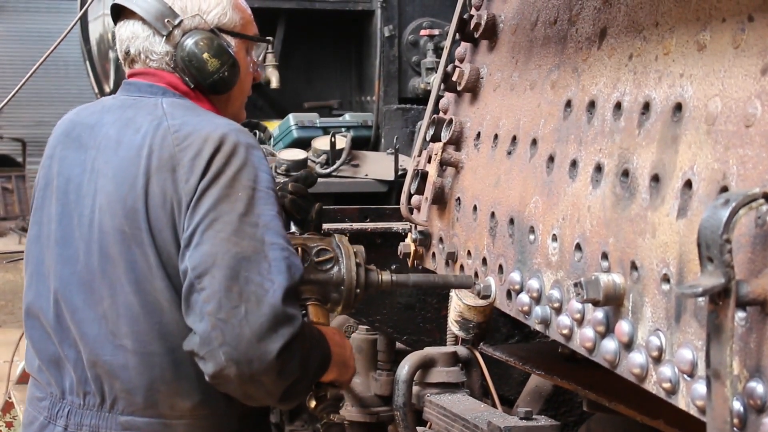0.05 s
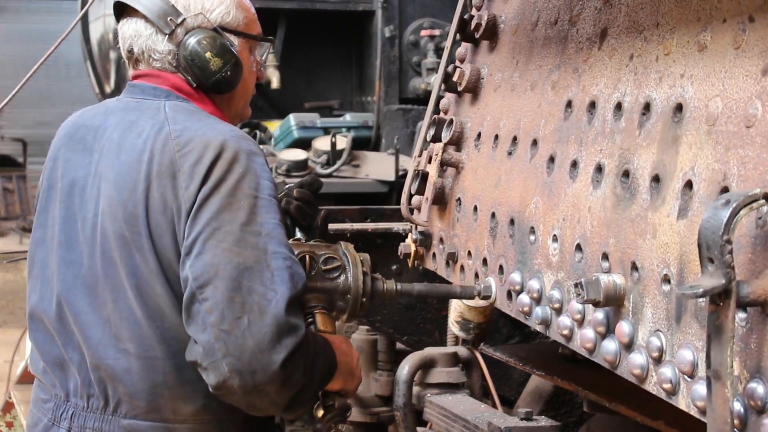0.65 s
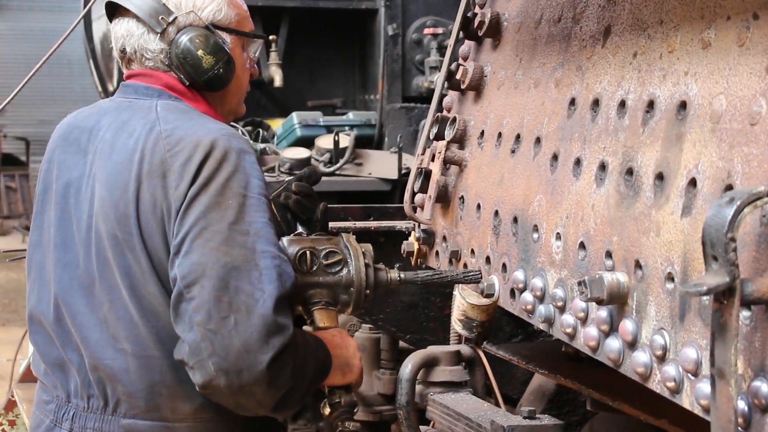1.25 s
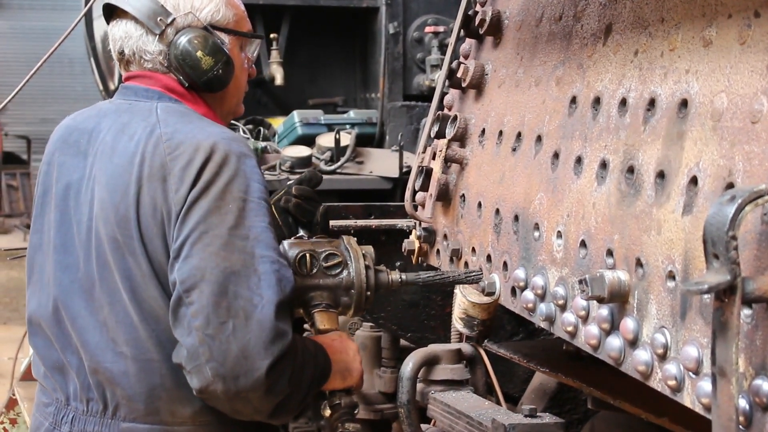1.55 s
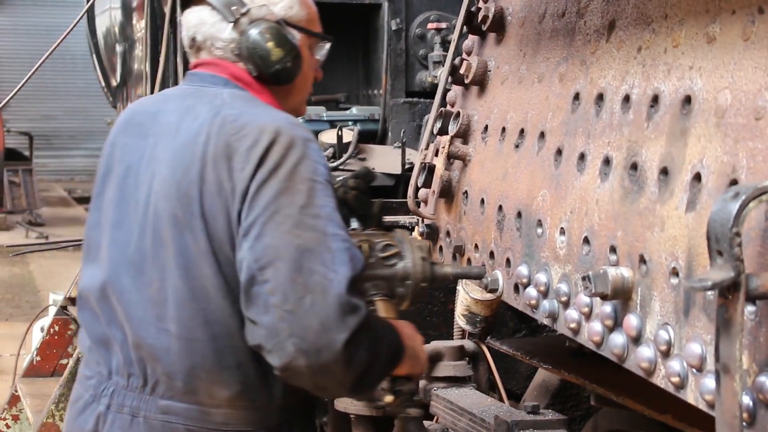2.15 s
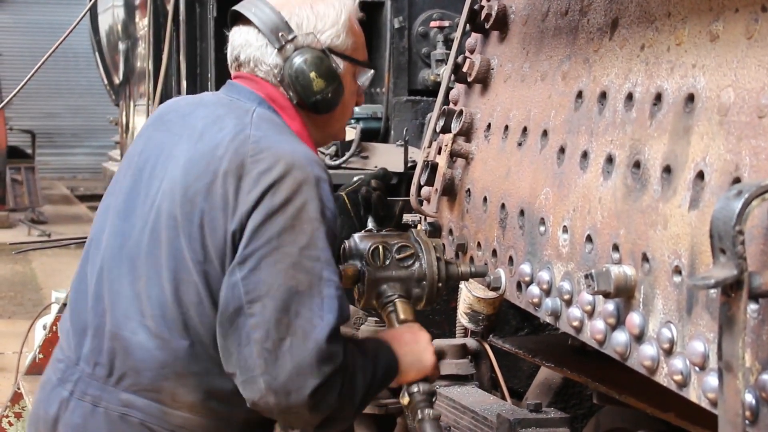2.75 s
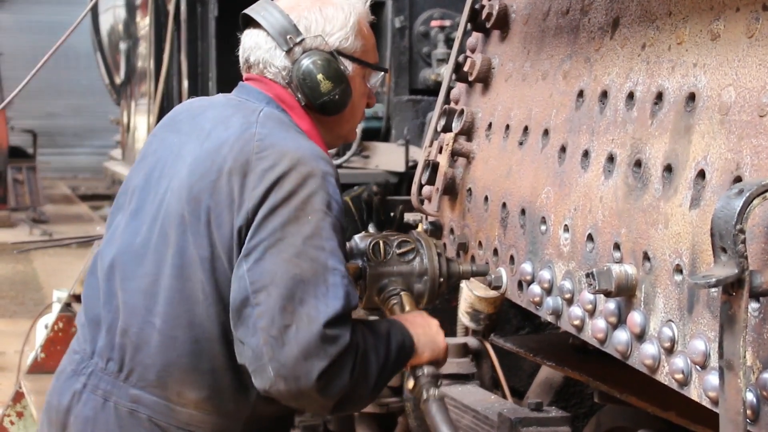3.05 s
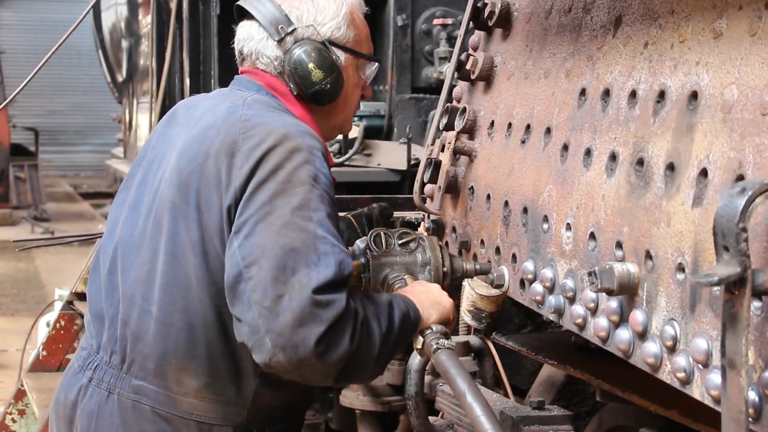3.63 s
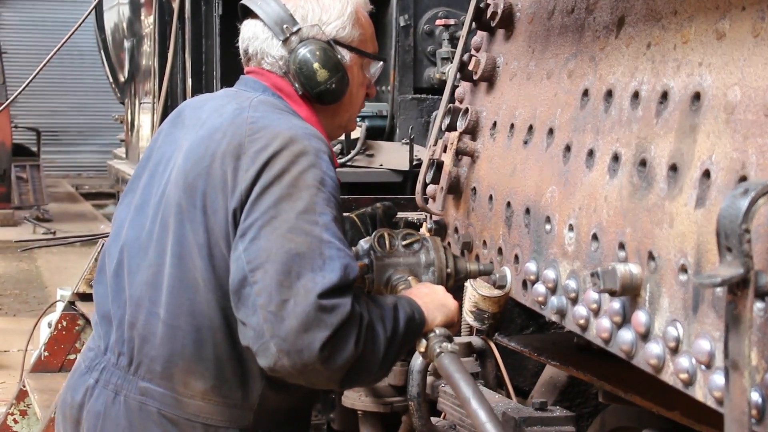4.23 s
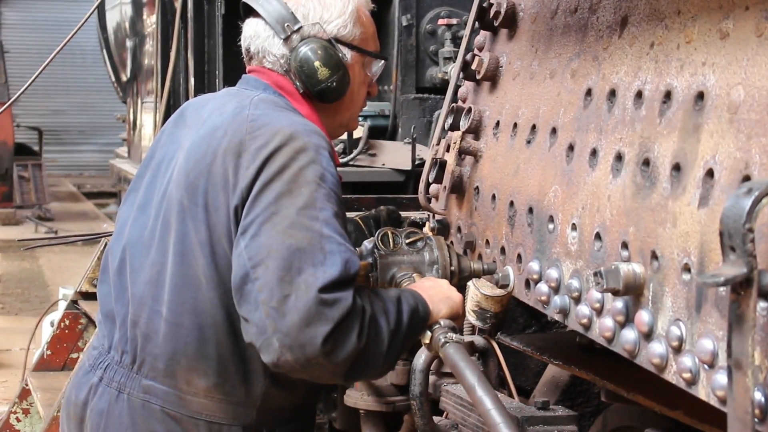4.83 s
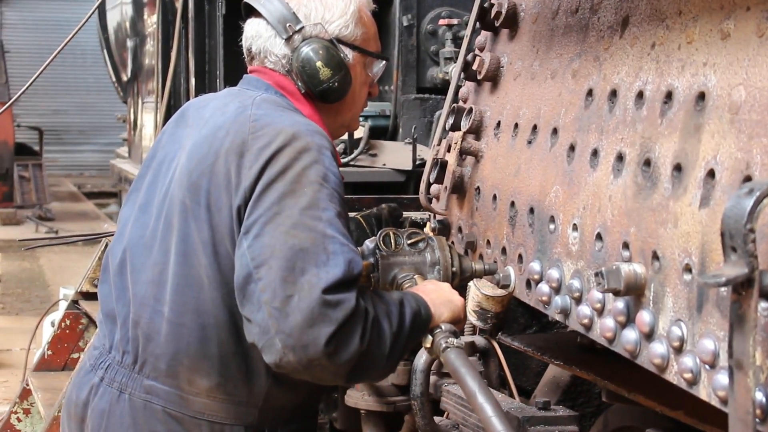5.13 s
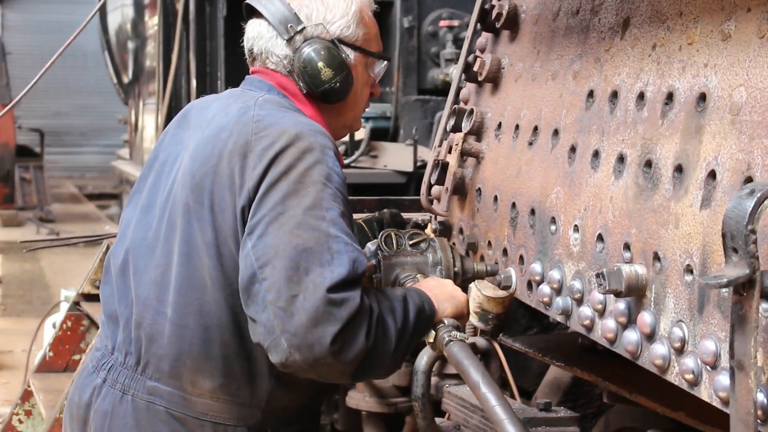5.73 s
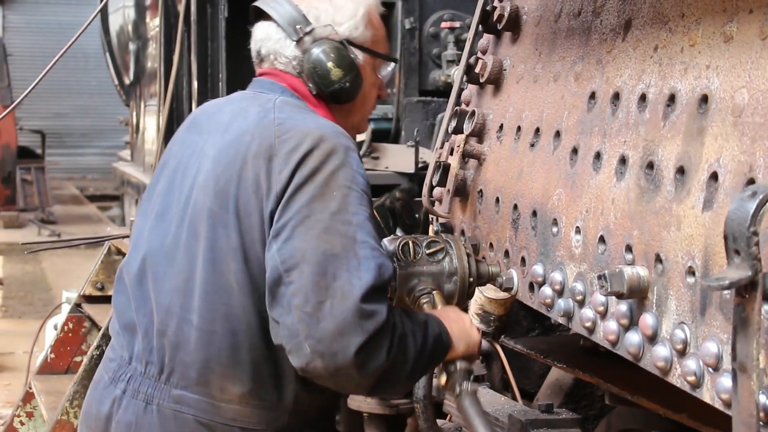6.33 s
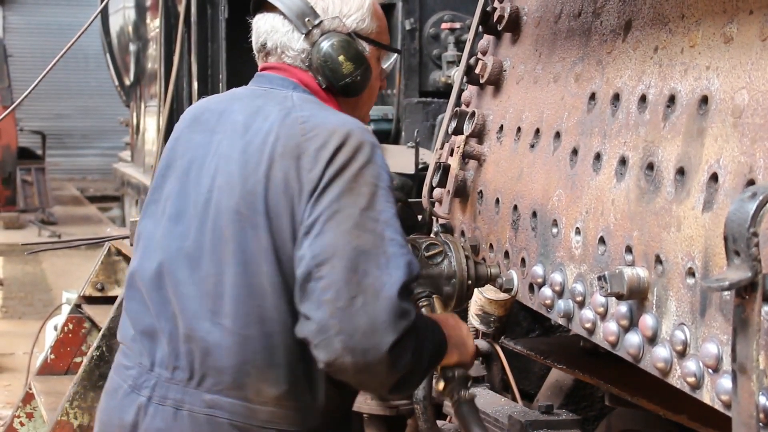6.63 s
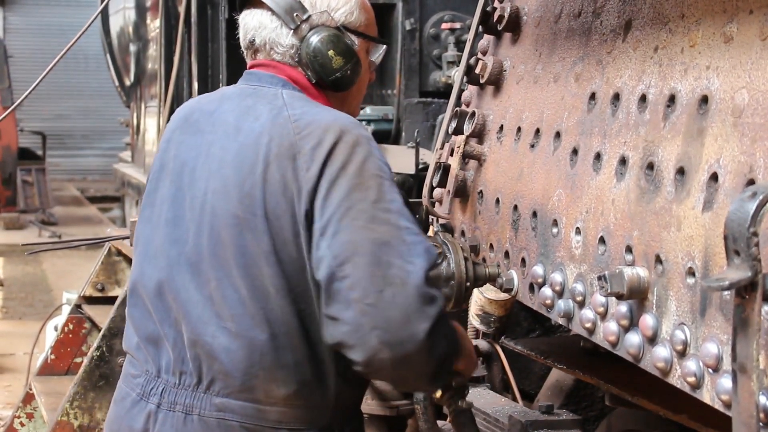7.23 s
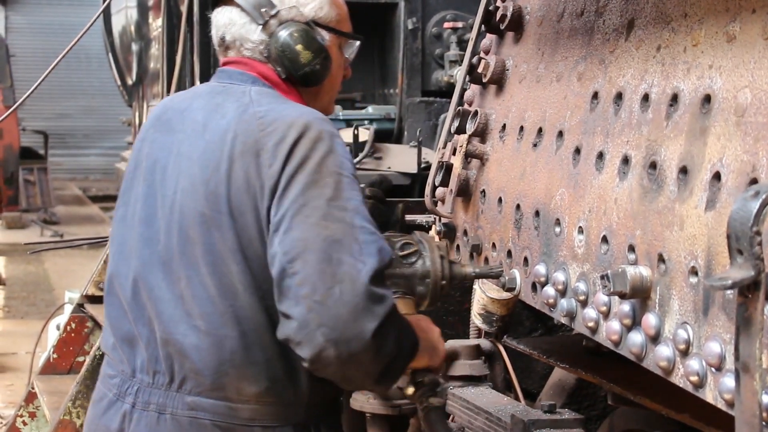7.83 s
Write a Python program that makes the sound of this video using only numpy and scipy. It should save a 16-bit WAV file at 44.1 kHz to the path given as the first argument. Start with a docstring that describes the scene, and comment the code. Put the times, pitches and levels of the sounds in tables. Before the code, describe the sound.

A hand-held air tool gives a short, harsh burst against a big steel plate, hissing and whistling while metal rattles in a hole. It stops, and the low rumble of machinery swells in the echoing workshop. After another short burst with dull knocks, the tool runs for several seconds with a loud, fluttering rush of air. It breaks off briefly and gives one last quick burst, all heard from close by.

```python
"""First comes a short, harsh burst of air: a hand-held air tool at the rivet holes of a big steel boiler
plate. More bursts follow, one of them long. The tool's motor puffs out a hissing exhaust; with the
throttle partly open, the valve whistles and the steel rattles in the hole. Machinery rumbles and thumps
in the echoing workshop hall, and an automatic gain control turns it up whenever the tool rests."""
import sys
import numpy as np
from scipy import signal
from scipy.fft import rfft, irfft
from scipy.io import wavfile
from scipy.ndimage import uniform_filter1d

SR = 44100
rng = np.random.default_rng(int(sys.argv[2]) if len(sys.argv) > 2 else 0)


def wav_out(sig):
    """Save sig, one row per channel (or a flat mono array), as 16-bit PCM at SR to the path in sys.argv[1]."""
    wavfile.write(sys.argv[1], SR, np.round(np.clip(np.atleast_2d(sig).T, -1, 1) * 32767).astype(np.int16))


N = 351918
TIME = np.arange(N) / SR
BIN_HZ = np.maximum(np.fft.rfftfreq(N, 1 / SR), 1)

# A COLOUR is a sound's broad balance of low and high: f/Hz, relative level/dB.
# MODES are resonances, the pitches at which something rings: f/Hz, width/Hz, lift/dB.
# All levels are set before the automatic gain.
# rumble and hum of the machinery
MACHINERY_COLOUR = [(25, -42), (45, -33), (62, -13.5), (100, -7.5), (150, -2.5), (270, 0), (450, -6),
                    (620, -10), (850, -19), (1500, -22.5), (2000, -21.5), (3800, -29), (8000, -39),
                    (15500, -61)]
MACHINERY_MODES = [(133, 9.5, 4.2), (153, 3.8, 2.1), (255, 9.1, 6.1), (327, 14, 4), (387, 8.8, 3.3),
                   (457, 23, 5.1), (545, 9.2, 4.6), (610, 4.8, 5.3), (834, 6, 12.3), (1850, 220, 6.6),
                   (2130, 148, 4.4), (3300, 140, 8.5), (5280, 110, 11)]
# level of the steady hall rumble, which swells in the pause and dips as the tool restarts: t/s, level/dB
RUMBLE_LEVEL = [(0, -33.5), (1.0, -31.5), (1.6, -29.5), (2.05, -29), (2.3, -36.5), (3.0, -33), (5.0, -34),
                (7.0, -35), (7.98, -33)]
# dull knocks on heavy steel: t/s, level/dB, time to fade by 60 dB/s, share that rings/0-1
THUMPS = [(2.316, -22, 0.47, 0.9), (2.36, -28, 0.13, 0.9), (2.676, -26.5, 0.36, 0.35),
          (2.714, -30, .25, 0.04), (2.752, -31, 0.2, .3), (6.169, -17, 0.38, 0.15), (6.209, -29.5, 1.4, 1)]
# their dead thud and low ring
THUMP_COLOUR = [(40, -42), (100, -14), (250, 4.5), (420, 2), (750, -5), (1100, -19), (3000, -46)]
THUMP_MODES = [(123, 58, 30.3), (327, 35, 18)]
# how long the hall echoes: f/Hz, time to fade by 60 dB/s
HALL_FADE = [(200, 0.95), (2000, 1.28), (5000, 1.13), (9000, 0.54), (15000, 0.37)]
# stereo width, from mid (what both ears share) and side (how they differ): f/Hz, side against mid/dB
STEREO_WIDTH = [(60, -17), (180, -21.5), (350, -17.5), (700, -15.5), (1400, -12.5), (2800, -9.5),
                (5600, -6), (11000, -4), (15000, -2)]
# lean to one ear: f/Hz, left minus right/dB
BALANCE = [(300, 0.63), (700, 0), (1400, -0.7), (2800, -2.5), (5600, 0), (14000, -1.7)]

# spurts of air as the throttle or grip shifts: t/s, length/s, f/Hz, width/Hz, level/dB
SPURTS = [(.13, .09, 5250, 700, -28.5), (2.32, .16, 8200, 900, -29), (2.78, .19, 2400, 500, -26),
          (2.765, 0.15, 8400, 1200, -29), (3.17, .09, 4400, 1000, -28), (6.08, .13, 11000, 3000, -37),
          (6.06, .35, 4000, 1500, -28), (6.92, 0.12, 4720, 1400, -27.5), (7.74, .04, 8000, 700, -29)]
# throttle presses: opens/s, closes/s, final opening/0-1, snap time/s, squeeze time/s, shut time/s,
# jet level/dB, rattle level/dB
PRESSES = [(-0.1, 0.77, 0.58, 0.029, 0.53, 0.1, -19.5, -21),
           (2.07, 2.585, 0.52, 0.1005, 0.3, 0.34, -23, -30.5),
           (2.75, 7.305, 0.99, 0.026, 0.24, 0.0916, -21.5, -27.5),
           (7.522, 7.77, 0.91, 0.08, 0.091, 0.059, -24, -29)]
# motor speed at full throttle, sagging as the steel bites: t/s, stroke rate/Hz
MOTOR_SPEED = [(2.85, 60), (2.95, 51), (3.46, 41), (3.7, 33.6), (4.19, 37.2), (5.96, 39.3), (6.37, 46.1),
               (6.53, 60), (7.3, 55)]
# tones in the motor's hum: multiple of the stroke rate, level against the exhaust/dB
MOTOR_TONES = [(3, -30.5), (4, -28), (5, -28), (6, -33)]
# the steel catches on a hole's rim: loudest at t/s, swell time/s, fade time/s, level/dB
CATCHES = [(0.14, 0.041, 0.057, -33), (2.16, 0.095, 0.05, -27.5), (2.73, 0.022, 0.04, -36),
           (7.29, 0.47, 0.032, -28), (7.63, 0.029, 0.046, -23)]
# loose, rattling steel
RATTLE_COLOUR = [(700, -18.5), (1200, -17), (1550, 0), (2300, -1.5), (2800, -10.5), (5000, -8.5),
                 (9000, -26)]
RATTLE_MODES = [(1550, 88, 3.4), (1690, 82, 2.3), (2132, 52, 7.1), (2206, 125, 7.4), (2353, 104, 6.7),
                (5270, 56, 5.6)]
# hiss and whistle of the air jet in the valve
JET_COLOUR = [(2500, -15), (4500, -9), (6500, -7), (8500, -1), (10000, -15), (12000, -14), (15700, -28)]
JET_MODES = [(2610, 430, 17), (4970, 240, 12.3), (5273, 127, 16), (5540, 90, 11), (5870, 130, 11.2),
             (6220, 120, 6.7), (6570, 350, 13.7), (7260, 360, 7.9), (7980, 280, 10), (8800, 160, 7),
             (9300, 320, 8.2), (9860, 430, 10.6), (10600, 260, 10), (10900, 200, 6.4)]
# exhaust with the tool held level, ringing in tool and plate
EXHAUST_COLOUR = [(150, -29), (300, -7.5), (500, -11.5), (830, -13), (1100, -8), (2000, -3), (4000, -5.5),
                  (6000, 0.0), (8000, -6.5), (10500, -12), (13000, -13), (15700, -20.5)]
EXHAUST_MODES = [(707, 220, 5.9), (966, 110, 3.4), (1106, 134, 8.4), (1259, 86, 7.7), (1396, 125, 12.1),
                 (1668, 78, 7.3), (1750, 53, 4.8), (1964, 79, 6.5), (2190, 230, 3.9), (2390, 550, 4.8),
                 (2870, 350, 4), (3236, 380, 8.9), (3833, 405, 10.3), (4253, 180, 7.4), (4664, 380, 7.3),
                 (4800, 73, 1.4), (5220, 190, 6.3), (5950, 260, 3.1), (7180, 340, 7.9), (7830, 173, 3.8),
                 (8440, 310, 8.7), (9350, 380, 2.8), (9750, 380, 4.2), (10360, 350, 7.5), (11250, 270, 7.6),
                 (11930, 252, 5.7)]
# exhaust with the handle swung down and the air outlet turned away
TURNED_COLOUR = [(150, -14), (300, -10.5), (500, -8.5), (830, -15), (1100, -1.5), (2000, -12), (4000, 2),
                 (6000, -3.5), (8000, -6), (10500, -14), (13000, -17), (15700, -23)]
TURNED_MODES = [(694, 190, 9.1), (1374, 180, 8.3), (1712, 200, 11), (1996, 260, 11.8), (2190, 253, 5.9),
                (2420, 95, 6.7), (2760, 230, 7.7), (3090, 132, 8.2), (3395, 81, 7), (4020, 110, 2.3),
                (4650, 410, 2.7), (5230, 75, 4.3), (5620, 380, 2.8), (6020, 97, 5.9), (7450, 341, 1.9),
                (8230, 210, 5.6), (9270, 380, 5.6), (9950, 179, 4.9), (10550, 380, 9.0), (11265, 216, 6.3),
                (11893, 380, 4.1), (13408, 83, 3.0)]
# how far the handle is swung down: t/s, share/0-1
HANDLE_SWING = [(0, 0.46), (2.2, 0.37), (2.75, 0.27), (3.1, 0.08), (5.95, 0), (6.3, 0.91), (7.3, 1),
                (7.7, 0.79)]
# narrow bands weakened by sound bouncing off the plate: f/Hz, width/Hz, change/dB
PLATE_DIPS = [(1217, 81, -3), (1530, 86, -1.5), (2350, 95, -2), (3070, 99, -2.5), (3500, 70, -0.5),
              (7500, 160, -1.5), (11800, 250, -1.5)]

EXHAUST_DB, EXHAUST_POWER = -17, 1.64   # level at full throttle, and how steeply it grows with opening
IDLE_STROKES_PER_S, IDLE_DB = 24, -50.5   # with the throttle shut, the motor ticks over on leaking air
NOTCH_OPENING = 0.42   # the valve snaps this far open and is squeezed on from there
PART_OPENING, PART_WIDTH = 0.6, 0.22   # jet and rattle are strongest around this opening
OPEN_JET_DB, OPEN_RATTLE_DB = -22, -12   # a little of each is left when wide open


def from_db(db):
    """Turn decibels into a gain to multiply by."""
    return 10 ** (np.asarray(db) / 20)


def rms_one(x):
    """Scale a signal so that its average strength (rms) is 1."""
    return x / np.sqrt(np.mean(x ** 2) + 1e-20)


def in_time(points):
    """Read a table's value at every sample."""
    return np.interp(TIME, *np.transpose(points))


def at_hz(points, hz):
    """Read a table by frequency, with octaves evenly spaced."""
    f, value = np.transpose(points)
    return np.interp(np.log(hz), np.log(f), value)


def drift(rate_hz):
    """A random wobble of strength 1, mostly slower than rate_hz."""
    return rms_one(irfft(rfft(rng.standard_normal(N)) / (1 + (BIN_HZ / rate_hz) ** 2), N))


def turbulence(grit=0., grains_per_s=600):
    """Two unrelated hisses, mid and side; grit mixes in sharp clicks."""
    grains = (rng.random((2, N)) < grains_per_s / SR) * rng.standard_normal((2, N))
    return rng.standard_normal((2, N)) + grit * rms_one(grains)


def resonate(drive, colour, modes, extra_db=0):
    """A ringing body colours the mid and side noise; out come left and right, averaging to strength 1."""
    peaks_db = sum(lift / (1 + (2 * (BIN_HZ - hz) / width) ** 2) for hz, width, lift in modes)
    cepstrum = irfft(np.log(from_db(at_hz(colour, BIN_HZ) + extra_db + peaks_db)), N)
    # minimum phase: the body rings after each push, never before it
    one_sided = np.r_[1, np.full(N // 2 - 1, 2), np.zeros(N - N // 2)]
    body = np.exp(rfft(cepstrum * one_sided))
    mid, side = rfft(drive) * body
    side = side * from_db(at_hz(STEREO_WIDTH, BIN_HZ))
    lean = from_db(at_hz(BALANCE, BIN_HZ) / 2)
    pair = irfft(np.array([(mid + side) * lean, (mid - side) / lean]), N)
    return pair / np.std(pair.mean(axis=0))


def machinery():
    """The hall's steady rumble and hum; its level swells in the pause and dips as the tool restarts."""
    gain = from_db(in_time(RUMBLE_LEVEL) + .5 * drift(5.8))
    return gain * resonate(turbulence(), MACHINERY_COLOUR, MACHINERY_MODES)


def thumps():
    """Each knock makes heavy steel shudder briefly: part dead thud, part low ring."""
    thud = resonate(turbulence(), THUMP_COLOUR, [])
    ring = resonate(turbulence(), THUMP_COLOUR, THUMP_MODES)
    out = 0
    for start, db, fade_s, share in THUMPS:
        shudder = (TIME >= start) * from_db(db - 60 * np.clip((TIME - start) / fade_s, 0, 2))
        out = out + shudder * (np.sqrt(1 - share) * thud + np.sqrt(share) * ring)
    return out


def hall_echo(x):
    """Countless echoes blur into a fading tail, built octave by octave; the highest die first."""
    t, response = TIME[:SR * 3 // 2], 0
    edges_hz = np.geomspace(125, 16000, 8)
    for low, high in zip(edges_hz, edges_hz[1:]):
        octave = signal.butter(2, [low, high], "band", fs=SR, output="sos")
        mid, side = signal.sosfilt(octave, rng.standard_normal((2, len(t))))
        hz = np.sqrt(low * high)
        band = mid + from_db(at_hz(STEREO_WIDTH, hz) + 2) * side * [[1], [-1]]
        response = response + band * from_db(-60 * t / at_hz(HALL_FADE, hz))
    response = response * np.minimum(t / 0.078, 1)   # the echoes take a moment to build up
    return signal.fftconvolve(x, response / np.sqrt(np.sum(response[0] ** 2)), axes=1)[:, :N]


def near_echoes(x, share, longest_s, sway_s, count):
    """Plate, floor and benches throw back quick echoes, whose paths shift as the worker moves."""
    out, sway = x.copy(), sway_s * drift(0.52)
    delays = rng.uniform(.003, longest_s, count)
    leans = rng.normal(0, 1, count)
    signs = rng.choice([-1, 1], count)
    for delay, lean, sign in zip(delays, leans, signs):
        echo = np.array([np.interp(TIME - delay - lean * sway, TIME, channel, left=0) for channel in x])
        out += sign * share / np.sqrt(count) * echo
    return out / np.sqrt(1 + share ** 2)


def spurts():
    """Air squeezes through a narrowed gap and rasps in one band for a moment."""
    out = np.zeros((2, N))
    for start, length, hz, width_hz, db in SPURTS:
        n, at = int(length * SR), int(start * SR)
        gap = signal.butter(2, [hz - width_hz / 2, hz + width_hz / 2], "band", fs=SR, output="sos")
        mid, side = rms_one(signal.sosfilt(gap, rng.standard_normal((2, SR)))[:, :n])
        rasp = mid + from_db(at_hz(STEREO_WIDTH, hz)) * side * [[1], [-1]]
        out[:, at:at + n] += from_db(db) * signal.windows.tukey(n, .5) * rasp
    return out


def ramp(start, length):
    """Rise from 0 to 1 over a length of time."""
    return np.clip((TIME - start) / length, 0, 1)


def throttle():
    """How far the valve is open, and how much jet and rattle that brings: most when partly open."""
    opening = jet = rattle = 0
    for opens, closes, final, snap_s, squeeze_s, shut_s, jet_db, rattle_db in PRESSES:
        press = NOTCH_OPENING * ramp(opens, snap_s) + (final - NOTCH_OPENING) * ramp(opens, squeeze_s)
        press = press * (1 - ramp(closes, shut_s))
        partly_open = np.exp(-((press - PART_OPENING) / PART_WIDTH) ** 2 / 2) * press / PART_OPENING
        opening = np.maximum(opening, press)
        jet = jet + from_db(jet_db) * (partly_open ** 2 + from_db(OPEN_JET_DB) * press)
        rattle = rattle + from_db(rattle_db) * np.maximum(partly_open, from_db(OPEN_RATTLE_DB) * press)
    return opening, jet, rattle


def strokes(phase, depth, valve_depth, flutter_db):
    """The air flow flutters and pulses: one puff and four smaller valve beats per motor stroke."""
    puff = np.exp(-(phase % 1) / .25)   # the outlet opens sharply, then the pressure sinks
    puff = rms_one(puff - puff.mean())
    valve_beats = np.cos(8 * np.pi * phase)
    return rms_one(from_db(flutter_db * drift(40)) * (1 + depth * puff + valve_depth * valve_beats))


def motor_hum(phase):
    """The pistons shake the casing at low multiples of the stroke rate."""
    return sum(np.sqrt(2) * from_db(db + 2.9 * drift(7.2)) * np.sin(2 * np.pi * round(multiple) * phase)
               for multiple, db in MOTOR_TONES)


def catches():
    """Extra rattle gain that swells as the steel meets a rim and fades as it slips in."""
    return sum(from_db(db) * np.exp(-np.maximum((peak - TIME) / swell_s, (TIME - peak) / fade_s))
               for peak, swell_s, fade_s, db in CATCHES)


def steel_rattle(phase, gain):
    """Loose steel chatters unevenly in the hole, harder when it catches."""
    chatter = turbulence(grit=0.29) * strokes(phase, depth=0.082, valve_depth=0.036, flutter_db=0.5)
    steel = resonate(chatter, RATTLE_COLOUR, RATTLE_MODES + PLATE_DIPS)
    return (gain * from_db(2.53 * drift(2.3)) + catches()) * steel


def valve_jet(phase, gain, leak_db=-65):
    """Air whistles through the valve, which never quite seals."""
    air = turbulence(grit=0.19) * strokes(phase, depth=0.14, valve_depth=.05, flutter_db=0.56)
    treble_tilt_db = at_hz([(500, -38), (2500, 10)], BIN_HZ)
    return (gain + from_db(leak_db)) * resonate(air, JET_COLOUR, JET_MODES + PLATE_DIPS, treble_tilt_db)


def exhaust(phase):
    """Used air puffs out of the motor; swinging the tool aims it elsewhere, so other pitches ring."""
    puffs = strokes(phase, depth=0.06, valve_depth=0.052, flutter_db=0.5)
    held_level = resonate(turbulence(grit=0.17) * puffs, EXHAUST_COLOUR, EXHAUST_MODES + PLATE_DIPS)
    turned = resonate(turbulence(grit=0.3) * puffs, TURNED_COLOUR, TURNED_MODES + PLATE_DIPS)
    swing = in_time(HANDLE_SWING)
    return np.sqrt(1 - swing) * held_level + np.sqrt(swing) * turned


def air_tool():
    """Exhaust, jet, rattle and hum all follow the throttle and beat in time with the motor."""
    opening, jet_gain, rattle_gain = throttle()
    exhaust_gain = from_db(EXHAUST_DB) * opening ** EXHAUST_POWER + from_db(IDLE_DB)
    speed = IDLE_STROKES_PER_S + opening * (in_time(MOTOR_SPEED) - IDLE_STROKES_PER_S)
    phase = np.cumsum(speed * (1 + 0.01213 * drift(6))) / SR   # counts the strokes so far
    direct = exhaust_gain * exhaust(phase) + valve_jet(phase, jet_gain) + steel_rattle(phase, rattle_gain)
    with_echoes = near_echoes(direct, share=0.31, longest_s=.022, sway_s=.00008, count=8)
    return with_echoes + exhaust_gain * motor_hum(phase)


def scene():
    """The tool close by, the hall around it."""
    near = air_tool() + spurts()
    return near + from_db(-14) * hall_echo(near) + thumps() + machinery()


def gain_control(x, target_db, release_db_per_s, attack_s):
    """The volume drops quickly under loud treble and creeps back up in the pauses."""
    treble = signal.sosfilt(signal.butter(2, 700, "high", fs=SR, output="sos"), x)
    level_db = 10 * np.log10(uniform_filter1d(np.mean(treble ** 2, axis=0), size=1800) + 1e-12)
    release_db = release_db_per_s * TIME
    held_db = np.maximum.accumulate(level_db + release_db) - release_db   # each peak sinks away slowly
    keep = np.exp(-1 / (attack_s * SR))
    smooth_db = signal.lfilter([1 - keep], [1, -keep], held_db - held_db[0]) + held_db[0]
    return x * from_db(target_db - smooth_db)


def record(dry):
    """The microphone loses the deepest bass; then come automatic gain and a steep cut of the top treble."""
    dry = signal.sosfilt(signal.butter(4, 48, "high", fs=SR, output="sos"), dry)
    levelled = gain_control(dry, target_db=-18.5, release_db_per_s=11.5, attack_s=0.056)
    return signal.sosfilt(signal.ellip(12, .2, 80, 15850, fs=SR, output="sos"), levelled)


dry = scene()
out = record(dry)
wav_out(out)
```